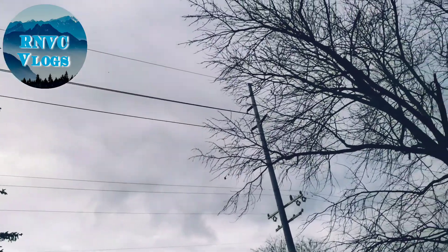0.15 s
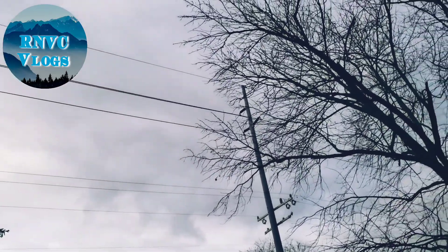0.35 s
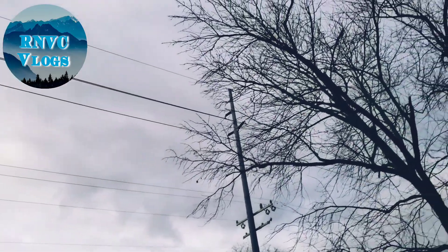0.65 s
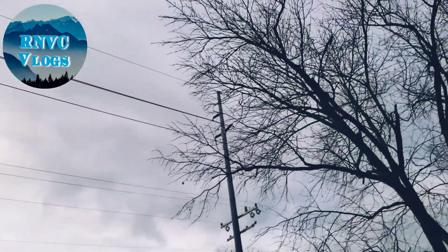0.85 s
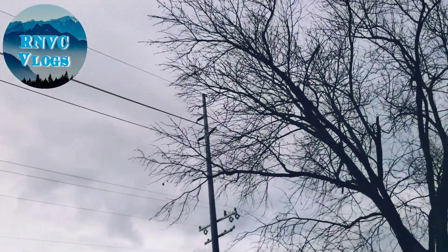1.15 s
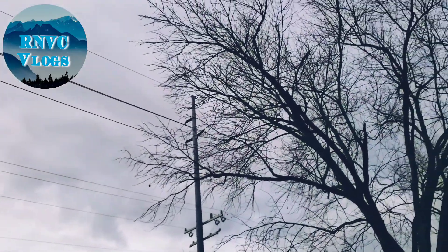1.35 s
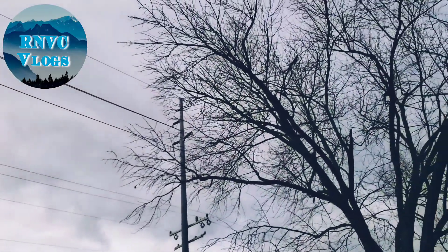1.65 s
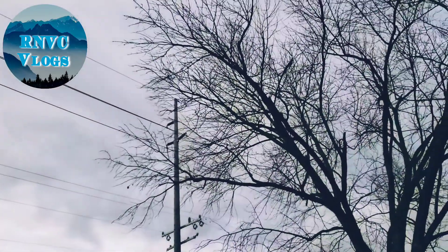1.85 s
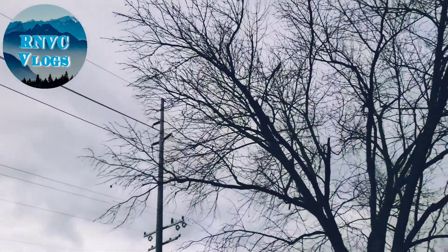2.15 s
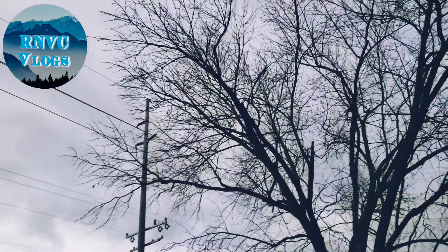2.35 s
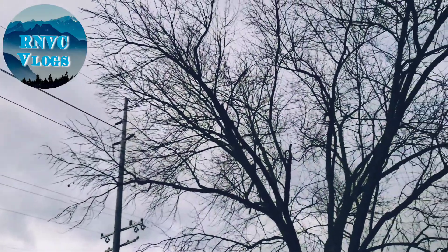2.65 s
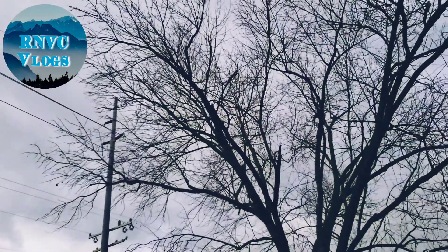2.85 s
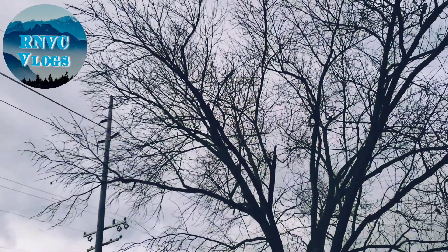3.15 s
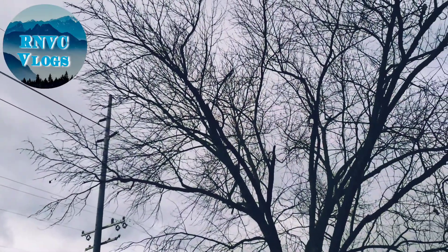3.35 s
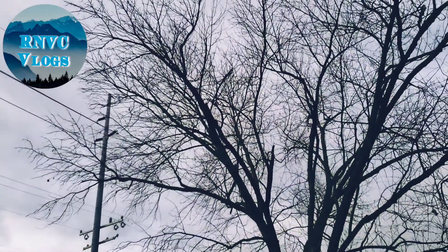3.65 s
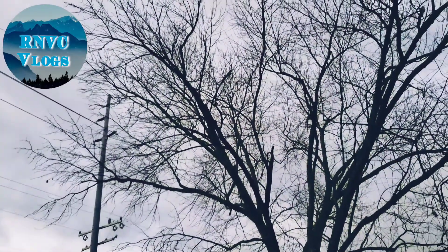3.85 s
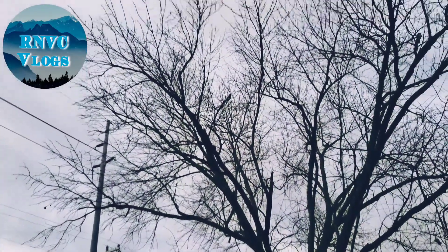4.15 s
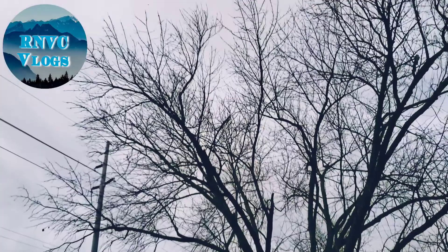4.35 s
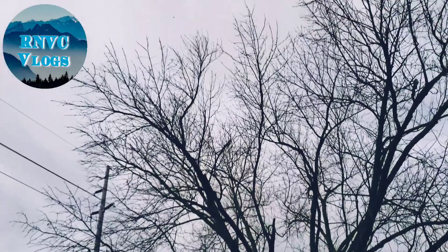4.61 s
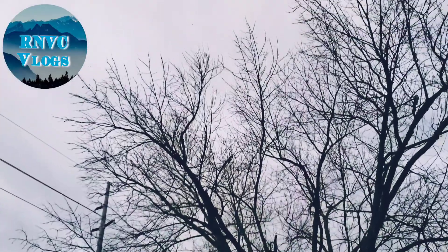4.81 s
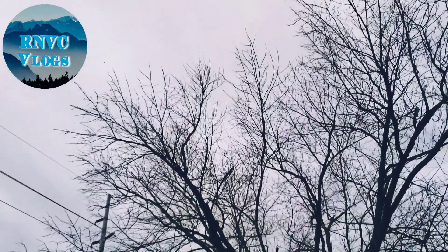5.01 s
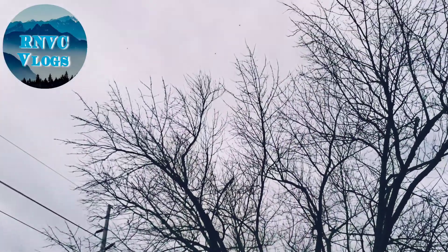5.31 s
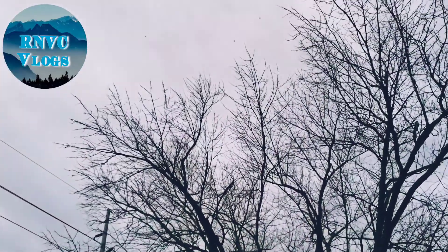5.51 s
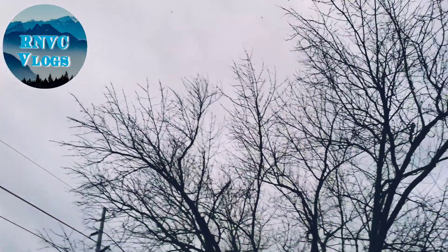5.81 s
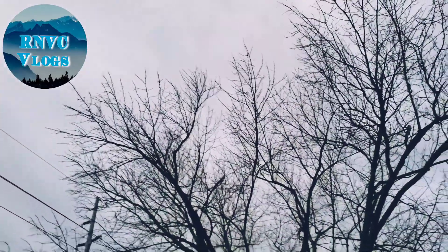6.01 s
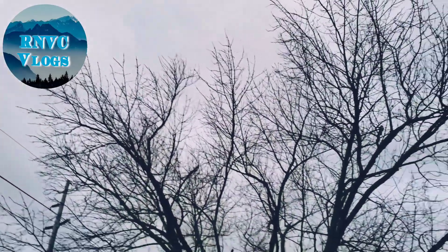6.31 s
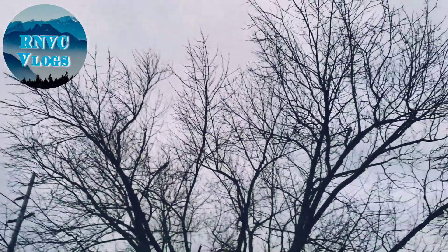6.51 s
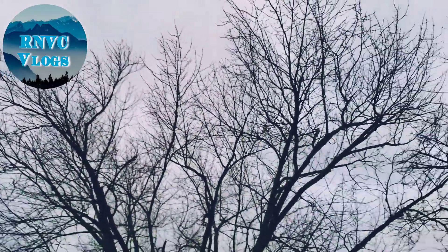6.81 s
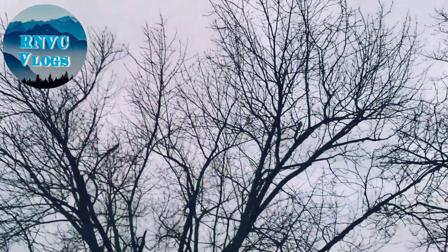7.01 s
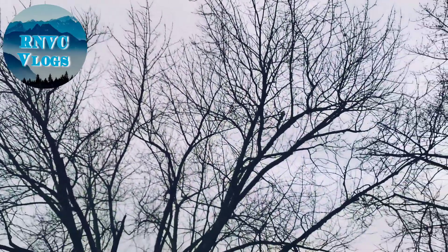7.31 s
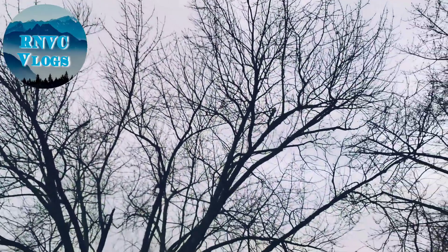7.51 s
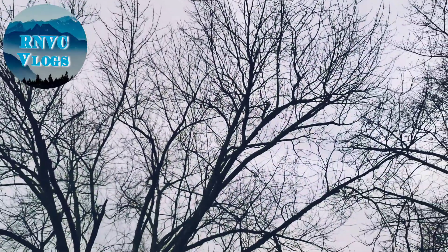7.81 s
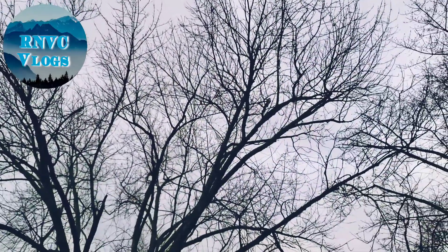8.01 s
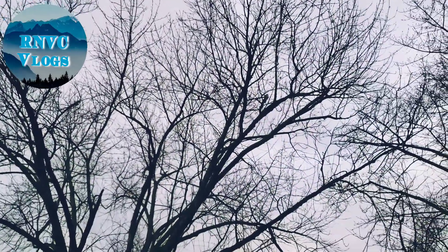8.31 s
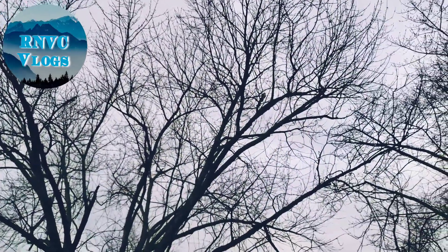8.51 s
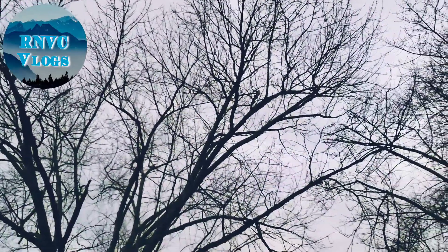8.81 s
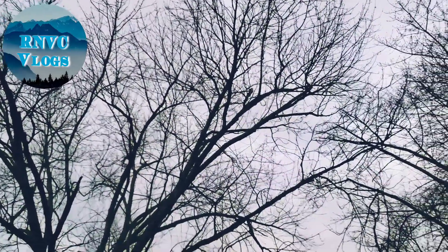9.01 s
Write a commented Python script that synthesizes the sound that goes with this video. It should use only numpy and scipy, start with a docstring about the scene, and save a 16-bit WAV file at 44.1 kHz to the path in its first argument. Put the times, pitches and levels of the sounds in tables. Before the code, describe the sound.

Sparrows chirp near and far among bare trees over a low rumble of light wind and distant traffic.

```python
"""A winter yard of bare trees and house walls. Sparrows chirp, one close and others further off; a larger
bird clucks a short series. Each call is two whistles at once, one from each side of the syrinx, scattered
by branches and walls. Other birds slip in plain whistles, and a few dry ticks sound. Underneath lies a
bed of light wind, far traffic, machine hum and faint hiss."""
import sys
import numpy as np
from scipy import signal
from scipy.fft import rfft, irfft, next_fast_len
from scipy.io import wavfile
from scipy.ndimage import uniform_filter1d, map_coordinates

SR = 44100
rng = np.random.default_rng(int(sys.argv[2]) if len(sys.argv) > 2 else 0)


def dump(signal):
    """Clip the signal to [-1, 1] and save it as 16-bit WAV at the path in sys.argv[1]."""
    limited = np.clip(np.atleast_2d(signal).T, -1, 1)
    pcm = np.round(limited * 32767).astype(np.int16)
    wavfile.write(sys.argv[1], SR, pcm)


N = 403956

# Noise colours of wind, tyres, hiss and ticks: (frequency [Hz], relative density [dB])
WIND_COLOUR = [(11, -41), (18, -14), (53, 3), (70, 6), (122, -7), (145, -14.5), (170, -23), (220, -52),
               (370, -120)]
TYRE_COLOUR = [(90, -54), (150, 2), (250, -2), (340, -3), (420, -9), (540, -13.5), (750, -12),
               (1050, -19.5), (1600, -21), (2600, -18.5), (5000, -57)]
HISS_COLOUR = [(600, -4.5), (1300, 2.5), (2500, 2.5), (3800, 0.5), (5500, 1.5), (6700, 13), (8000, -2),
               (9700, -3.5), (11500, 2), (13300, 6), (15700, 1)]
TICK_COLOUR = [(2500, -22), (5000, 8), (9000, -6), (14000, -10)]
# Stereo image of the noises: (frequency [Hz], left-right correlation [ratio])
STEREO_LIKENESS = [(30, 0.022), (70, 0.66), (130, 0.84), (280, 0.86), (550, 0.1), (1200, 0.03),
                   (8000, 0.033)]
# Wind puffs on the microphone: (peak time [s], length [s], level [dB], pan L-R [dB])
PUFFS = [(0.647, 0.15, -48, 14), (0.987, 0.46, -52.5, 7.5), (1.9, 0.32, -42, 6), (2.55, 0.16, -46, -2),
         (3.18, 0.072, -46.5, -15), (3.517, 0.4, -44, 4), (4.0, .22, -50.5, 5), (4.743, 0.13, -48.5, 15.5),
         (5.042, 0.24, -39.5, 4.5), (5.35, 0.18, -45, 6), (5.645, 0.11, -41, 16.5), (5.963, 0.42, -48.5, 0),
         (6.452, 0.38, -44.5, 10), (7.353, 0.34, -50, 11), (8.27, 0.18, -49.5, -6), (8.7, 0.16, -46.5, 4)]
# Fader rides for far tyres, the lower and higher machine, and the flock: (time [s], level [dB])
TYRE_RIDE = [(0, -72), (.25, -78), (.85, -70), (1.35, -75.5), (2.55, -71.5), (2.9, -79), (3.45, -73),
             (4.4, -77), (4.95, -71), (6, -73.5), (6.3, -69.5), (7.15, -74.5), (8.1, -76), (9.16, -71)]
LOW_MACHINE_RIDE = [(0.0, -76), (0.66, -66), (1.99, -71.5), (2.81, -78.5), (5.51, -62.5), (7.04, -78.5),
                    (9.13, -69), (9.16, -74)]
HIGH_MACHINE_RIDE = [(0, -84), (1.2, -76), (2.4, -72.5), (2.85, -95), (3.4, -65), (4.2, -93), (5.2, -81),
                     (6.4, -73.5), (7.5, -83.5), (9.16, -79)]
FLOCK_RIDE = [(0, -73), (.4, -63), (1.1, -70), (1.9, -62), (2.8, -75.5), (3.2, -66), (4.2, -83.5),
              (5.2, -63.5), (5.8, -80), (6.5, -64.5), (7.8, -70.5), (8.5, -63), (9.16, -86)]
# Drone of a far engine: (frequency [Hz], level [dB])
ENGINE_TONES = [(71, -59.5), (97, -64), (120, -62.5), (162, -75)]
# Call shapes: (position [0-1], lower voice [Hz], upper voice [Hz], lower level [dB], upper level [dB])
CHIRP_SHAPE = [(0, 1798, 3270, -25, -18), (.1, 2834, 4790, -8.5, -18), (.2, 3604, 6200, -11, -26),
               (.3, 4160, 7110, -4.5, -17.5), (.42, 4203, 7806, -5.5, -21), (.55, 4402, 7994, 1.5, -19),
               (.66, 4208, 8030, -14.5, -34), (.76, 3805, 7300, 1, -36), (.84, 3429, 6560, -4.5, -27),
               (.91, 2457, 5200, 2.5, -24), (.95, 2480, 4440, -18, -55), (1, 1380, 3300, 9.5, -62)]
CHEEP_SHAPE = [(0, 2412, 3603, -28, -9), (.13, 3277, 6004, -13.5, -13), (.22, 4264, 7400, -5, -19),
               (.32, 4544, 8100, 1.5, -26), (.45, 4620, 8400, -1.5, -23), (.57, 4996, 8355, -0.5, -17),
               (.66, 4425, 7700, -8.5, -50), (.74, 3753, 5560, 1.5, -29), (.82, 3454, 5130, -7.5, -52),
               (.9, 2617, 4380, -4, -52), (1, 1880, 3500, -29, -55)]
CLUCK_SHAPE = [(0, 1760, 2600, -14, -28), (.25, 1880, 3020, -3.5, -8), (.55, 1700, 2880, -3, -8.5),
               (.8, 1540, 2380, -13.5, -3), (1, 1263, 2120, -18, -20)]
# Cues for far sparrows, the answering sparrow and the larger bird: (time [s], length [s],
# lower voice top [Hz], upper voice top [Hz], gain [dB], swell [dB], pan L-R [dB], left lag [ms])
FAR_CHEEPS = [(0.083, .075, 3620, 6380, -66, -20, 0, 0), (1.212, 0.084, 4910, 8400, -63.5, 16, 0.004, .1),
              (1.654, 0.087, 4460, 7700, -55, 24.5, 0, .1), (1.773, 0.079, 4570, 7700, -54.5, 18, 0, .1),
              (1.913, 0.062, 4650, 7960, -56, 22, 0.0013, .1), (2.071, .11, 4800, 7960, -60, 12, 0, .1),
              (5.441, 0.09, 4330, 7560, -67, 12, 0.0096, 0)]
ANSWER_CHEEPS = [(0.208, .11, 4780, 8100, -46.5, 0.11, 4, -0.38),
                 (0.68, 0.108, 4895, 8490, -42.5, 0, 2.8, -0.44),
                 (2.143, 0.1, 4767, 8200, -42.5, 0, 4.7, -0.24),
                 (2.615, 0.11, 4765, 8500, -45.5, 0.1, 3.9, -0.29),
                 (4.411, 0.11, 4874, 8240, -50.5, 1, 6.7, -.2),
                 (6.209, 0.097, 4790, 8330, -45.5, 0, 8.8, -0.079),
                 (6.602, 0.11, 4980, 8380, -47, 0, 4.3, -0.21)]
CLUCKS = [(1.110, 0.034, 1986, 3300, -56.5, 0.01, 2, 0.059), (3.878, 0.06, 1723, 2890, -57, 0, -7, 0.067),
          (7.176, 0.041, 1850, 3033, -46, 0.0061, -3.5, 0.035),
          (7.564, 0.038, 1740, 2925, -48.5, 0.0058, -2, 0.045),
          (7.686, 0.06, 2110, 3300, -55, 0.015, -1, 0.16), (7.835, 0.044, 2160, 3510, -51, 0, 4, 0.12),
          (7.866, 0.039, 1716, 2947, -46.5, 0, -2.5, 0.12), (8.062, 0.056, 1850, 3290, -53, 0.0013, 1, .1),
          (8.252, 0.051, 1853, 3390, -53, 0, 0, 0.072), (8.459, 0.056, 1855, 3110, -55.5, 0.013, -5, 0.1)]
# Cues for the close sparrow: as above, then (upper voice gain [dB], lean [exponent])
CLOSE_CHIRPS = [(0.532, 0.093, 4305, 8000, -33.5, 6, 0.92, 0.32, -1, 1.03),
                (1.550, 0.087, 4313, 7820, -36.5, -2, 3.9, 0.16, -0.5, 1.14),
                (2.489, 0.1, 4563, 8360, -35.2, 1.5, 2.6, 0.16, 5, 0.99),
                (3.308, 0.089, 4378, 7740, -35, 3.5, 2.7, 0.15, 2.5, 1.19),
                (4.755, .095, 4504, 8300, -32.5, 3.5, 2.9, .16, 0.5, 1.1),
                (6.756, 0.093, 4554, 8090, -32, 2.5, 3.3, 0.35, 3, 1),
                (8.603, 0.095, 4097, 7220, -32.5, -7, 4.6, -0.45, 3, 0.86)]
# Reverb tail of the yard: (frequency [Hz], T60 [s])
YARD_DECAY = [(1000, 0.42), (2800, 0.94), (4500, 1.156), (7500, 0.63), (12000, 0.68)]
# EQ of the reverb, and the microphone's treble on the birds: (frequency [Hz], gain [dB])
REVERB_EQ = [(1200, -1.5), (2700, 1.5), (3500, -1), (4400, -1), (5200, 2.5), (12000, 2)]
MICROPHONE_EQ = [(1000, -1), (7400, 0.5), (8400, -0.5), (9400, -8.5), (10400, -2), (11200, 9), (12500, 7.5),
                 (13400, -5), (16000, -3)]
# Dry ticks: (time [s], level [dB])
TICKS = [(1.124, -62), (4.232, -71), (7.44, -66), (7.915, -70)]
# Other birds' slides: (time [s], length [s], start [Hz], end [Hz], level [dB], pitch waver [ratio])
WHISTLES = [(1.4, 0.066, 4120, 3970, -54.5, 0.013), (1.49, 0.011, 4250, 4930, -60, 0.036),
            (2.988, 0.48, 3000, 2854, -68.5, 0.039), (3.716, 0.068, 3040, 2830, -66, .06),
            (5.07, 0.039, 8800, 7000, -66.5, 0.047), (5.103, 0.044, 6980, 6630, -59.5, 0.023),
            (5.289, 0.054, 3030, 2590, -60.5, 0.029), (5.309, 0.075, 3964, 4034, -58, 0.014),
            (5.919, 0.39, 1357, 1174, -71.5, 0.0089), (6.125, 0.024, 8850, 7050, -72, 0.026),
            (6.545, 0.078, 2670, 2650, -63, 0.013), (7.058, 0.018, 4330, 5600, -66, 0.045),
            (7.304, 0.018, 5670, 4100, -62, 0.045), (7.601, .8, 4960, 4920, -79, .035)]


def amp(db):
    """Decibels to gain."""
    return 10 ** (np.asarray(db) / 20)


def unit(x):
    """x at rms 1."""
    return x / np.sqrt(np.mean(x ** 2) + 1e-20)


def along(points, hz):
    """Read a curve on a log frequency axis."""
    freqs, values = np.transpose(points)
    return np.interp(np.log(hz + 1), np.log(freqs + 1), values)


def ride(points):
    """A fader ride, one value per sample."""
    return np.interp(np.arange(N) / SR, *np.transpose(points))


def wobble(rate, size=N):
    """A smooth random curve, rate knots a second."""
    knots = rng.standard_normal(int(size * rate / SR) + 4)
    return map_coordinates(knots, [np.arange(size) * rate / SR])


def phase_of(hz):
    """Running phase of a gliding frequency."""
    return 2 * np.pi * np.cumsum(hz) / SR


def filtered(x, response):
    """EQ x with a gain that depends on frequency."""
    size = next_fast_len(N + SR // 2)
    return irfft(rfft(x, size) * response(np.fft.rfftfreq(size, 1 / SR)), size)[..., :N]


def add(track, time, sound):
    """Mix a sound into a track at a time in seconds."""
    part = track[..., max(round(time * SR), 0):][..., :sound.shape[-1]]
    part += sound[..., :part.shape[-1]]


def pan(db):
    """Left and right gains, db apart."""
    return amp(np.array([[.5], [-.5]]) * db)


def stereo_noise(colour):
    """Coloured noise of rms 1, narrowest in the low mids."""
    def mid_side_gains(hz):
        width = np.arccos(along(STEREO_LIKENESS, hz)) / 2
        return amp(along(colour, hz)) * [np.cos(width), np.sin(width)]
    mid, side = filtered(rng.standard_normal((2, N)), mid_side_gains)
    return unit(np.array([mid + side, mid - side]))


def wind(rumble_db=-53.8, sway_db=0.65, flutter_db=2.5, puff_edge_db=13):
    """A restless rumble; each puff swells and dies, stronger at the microphone port that faces it."""
    t = np.arange(N) / SR
    power = amp(rumble_db + sway_db * wobble(2.7) + flutter_db * np.array([wobble(14), wobble(14)])) ** 2
    for peak, length, db, pan_db in PUFFS:
        puff = amp(db - puff_edge_db * (2 * (t - peak) / length) ** 2)
        power += (pan(pan_db) * puff) ** 2
    return np.sqrt(power) * stereo_noise(WIND_COLOUR)


def traffic(trim_db=10):
    """Far tyres on the road: a dull wash that rises and falls."""
    return amp(ride(TYRE_RIDE) + trim_db) * stereo_noise(TYRE_COLOUR) * pan(0.39)


def hiss(level_db=-71.5):
    """A faint, almost steady bed of bright noise."""
    return amp(level_db + 0.65 * wobble(3.23)) * stereo_noise(HISS_COLOUR) * pan(1)


def machines(low_hz=294.6, high_hz=359.5):
    """Two distant machines fade in and out over an engine drone that arrives from all around."""
    def tone(hz, db, drift):
        return np.sqrt(2) * amp(db + 1.43 * wobble(4)) * np.sin(phase_of(hz * (1 + drift * wobble(6))))
    octave_db = np.interp(np.arange(N) / SR, [7.7, 7.98], [-86.5, -76.5])  # swells once and stays up
    hum = tone(low_hz, ride(LOW_MACHINE_RIDE), drift=0.0028)
    hum += tone(high_hz, ride(HIGH_MACHINE_RIDE), drift=0.0019)
    hum += tone(2 * low_hz, octave_db, drift=0.0024)
    drone_mid, drone_side = [sum(tone(hz, db, drift=0.02226) for hz, db in ENGINE_TONES) for _ in range(2)]
    return pan(3.1) * (hum + amp(-0.5) * drone_mid + amp(-13) * drone_side * np.array([[1], [-1]]))


def syrinx(shape, length, low_hz, high_hz, swell_db, upper_db=0, lean=1, *, force_db, quaver):
    """Two gliding whistles; forced hard, they modulate each other into sum, difference and octave tones."""
    def shake(rate=260):
        return wobble(rate, size=SR // 6)[:len(progress)]
    progress = np.linspace(0, 1, int(length * SR))
    knots, *columns = np.transpose(shape)
    leaned = progress ** lean  # under 1, the pitch peaks early
    low, high, low_db, high_db = [uniform_filter1d(np.interp(leaned, knots, c), 150) for c in columns]
    low_phase = phase_of(low * low_hz / low.max() * (1 + quaver * shake()))
    high_phase = phase_of(high * high_hz / high.max() * (1 + quaver / 2 * shake()))
    high_phase += 0.53 * shake(2400)  # the upper voice rasps
    low_gain = amp(low_db + 2 * shake())
    high_gain = amp(high_db + upper_db + 2 * shake())
    coupled = (low_gain * amp(-3) * np.sin(low_phase + high_phase)
               + amp(-12) * np.sin(high_phase - low_phase)
               + amp(-8) * np.sin(2 * high_phase))
    voices = low_gain * np.sin(low_phase) + high_gain * (np.sin(high_phase) + amp(force_db) * coupled)
    return voices * amp(swell_db * (progress - .5)) * signal.windows.tukey(len(progress), .1)


def yard_reverb(x, near_db, far_db, wall_db=-20, wall_s=0.034, near_t60=0.25):
    """Wet only: branches and a wall scatter the sound at once; the street beyond adds a long tail."""
    size, slap_size = SR * 3 // 2, SR // 600
    t = np.arange(size) / SR
    near_envelope = amp(-60 * t / near_t60) * (1 - np.exp(-t / 0.001))
    near = unit(rng.standard_normal((2, size)) * near_envelope) / np.sqrt(size)
    slap = unit(rng.standard_normal((2, slap_size))) / np.sqrt(slap_size)
    add(near, wall_s, amp(wall_db) * slap)
    hz, age, bands = signal.stft(rng.standard_normal((2, size)), SR, nperseg=256)
    tail_envelope = amp(-60 * age / along(YARD_DECAY, hz)[:, None]) * (1 - np.exp(-age / 0.023))
    tail = signal.istft(bands * tail_envelope, SR, nperseg=256)[1][:, :size]
    impulse = amp(near_db) * near + amp(far_db) * unit(tail) / np.sqrt(size)
    impulse = irfft(rfft(impulse) * amp(along(REVERB_EQ, np.fft.rfftfreq(size, 1 / SR))))
    return signal.fftconvolve(x, impulse[:, :SR * 4 // 3], axes=1)[:, :N]


def flock(count=170, spread_db=3.5):
    """Many distant birds at random moments and pitches, blurred into a chatter."""
    track = np.zeros((2, N))
    for k, (jitter, pitch, strength, side) in enumerate(rng.random((count, 4))):
        low_hz = 2300 + 1800 * pitch ** 1.3
        call = syrinx(CHEEP_SHAPE, .09, low_hz, 2 * low_hz, swell_db=0, force_db=-4, quaver=0.0513)
        add(track, (k + jitter) / count * N / SR, amp(spread_db * strength) * pan(6 * (side - .5)) * call)
    return unit(yard_reverb(track, near_db=-5.5, far_db=-5.5)) * amp(ride(FLOCK_RIDE))


def bird(shape, cues, force_db, quaver, bounce_db=-11):
    """Each call arrives directly and by a short detour, so its level wavers as it glides."""
    track = np.zeros((2, N))
    for time, length, low_hz, high_hz, db, swell_db, pan_db, lag_ms, *voicing in cues:
        call = syrinx(shape, length, low_hz, high_hz, swell_db, *voicing, force_db=force_db, quaver=quaver)
        left, right = amp(db) * pan(pan_db) * call
        detour_s = 0.0033 * (.5 + rng.random())
        for delay, gain in (0, 1), (detour_s, amp(bounce_db)):
            add(track[0], time + delay + lag_ms / 1000, gain * left)
            add(track[1], time + delay, gain * right)
    return track


def ticks(t60=0.11):
    """Bright, twig-like ticks of noise that die at once."""
    envelope, t = np.zeros(N), np.arange(SR // 5) / SR
    for time, db in TICKS:
        add(envelope, time, amp(db - 60 * t / t60))
    return envelope * stereo_noise(TICK_COLOUR)


def whistles():
    """Other birds whistle straight, slightly unsteady slides with a single voice."""
    track = np.zeros((2, N))
    for time, length, start_hz, end_hz, db, waver in WHISTLES:
        size = int(length * SR)
        glide = np.linspace(start_hz, end_hz, size) * (1 + waver * wobble(270)[:size])
        add(track, time, amp(db) * np.hanning(size) * np.sin(phase_of(glide)))
    return track


def scene():
    """Birds over the neighbourhood bed; the further off a bird sits, the wetter it sounds."""
    close = bird(CHIRP_SHAPE, CLOSE_CHIRPS, force_db=-4, quaver=0.0254)
    answer = bird(CHEEP_SHAPE, ANSWER_CHEEPS, force_db=-9.5, quaver=.013)
    clucks = bird(CLUCK_SHAPE, CLUCKS, force_db=-16, quaver=0.055)
    far = bird(CHEEP_SHAPE, FAR_CHEEPS, force_db=-6, quaver=0.0213) + whistles()
    birds = (close + yard_reverb(close, near_db=-2, far_db=-13, wall_db=-9.5, near_t60=0.29)
             + answer + yard_reverb(answer, near_db=-1, far_db=-10.5)
             + clucks + yard_reverb(clucks, near_db=-9.5, far_db=-3.5)
             + far + yard_reverb(far, near_db=3.5, far_db=-3.5) + flock())
    birds = filtered(birds, lambda hz: amp(along(MICROPHONE_EQ, hz)))
    return birds + ticks() + machines() + wind() + traffic() + hiss()


def record(dry, top_hz=15750):
    """A brick-wall high cut on the whole mix."""
    return filtered(dry, lambda hz: hz < top_hz)


dry = scene()
out = record(dry)
dump(out)
```